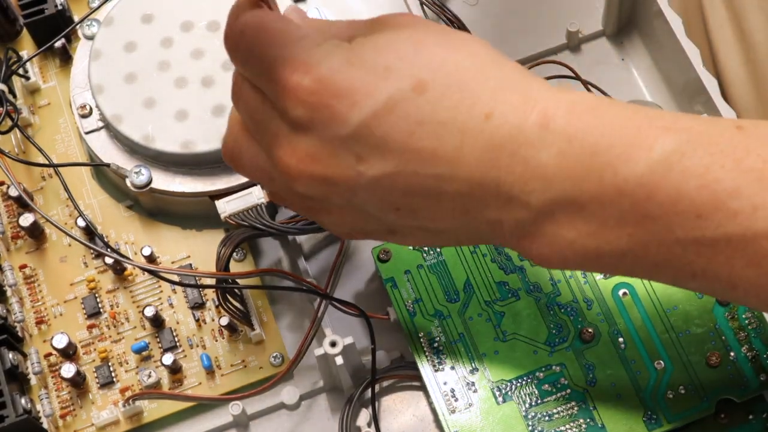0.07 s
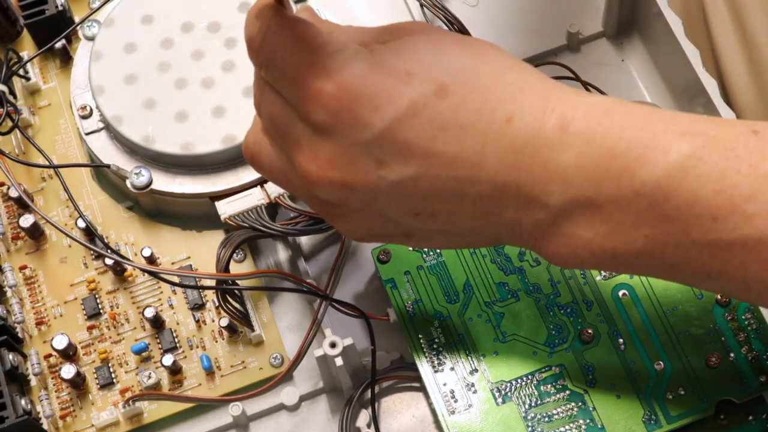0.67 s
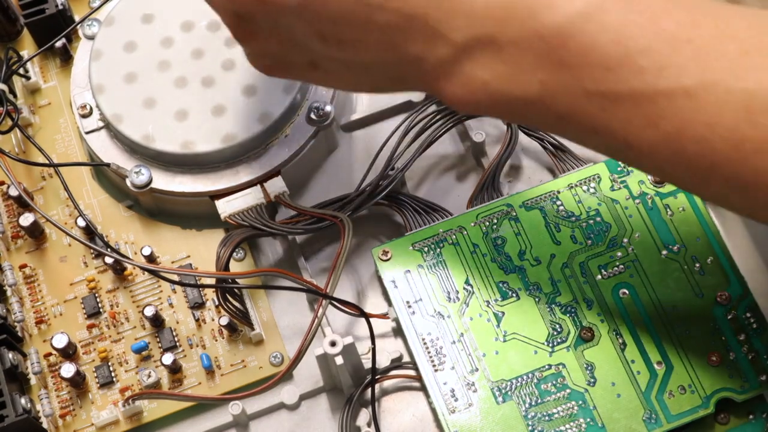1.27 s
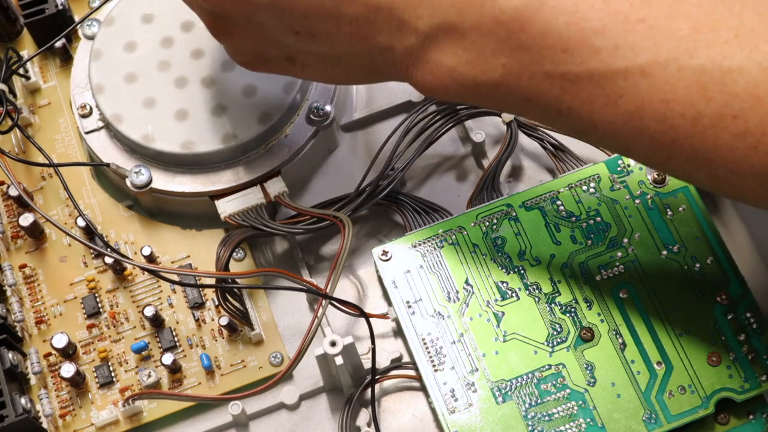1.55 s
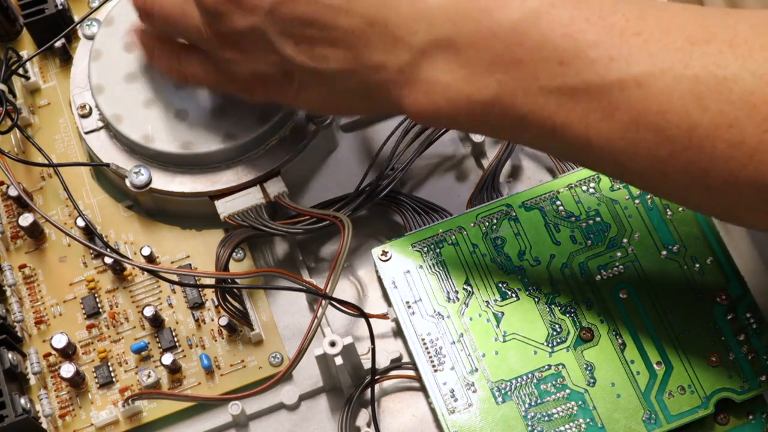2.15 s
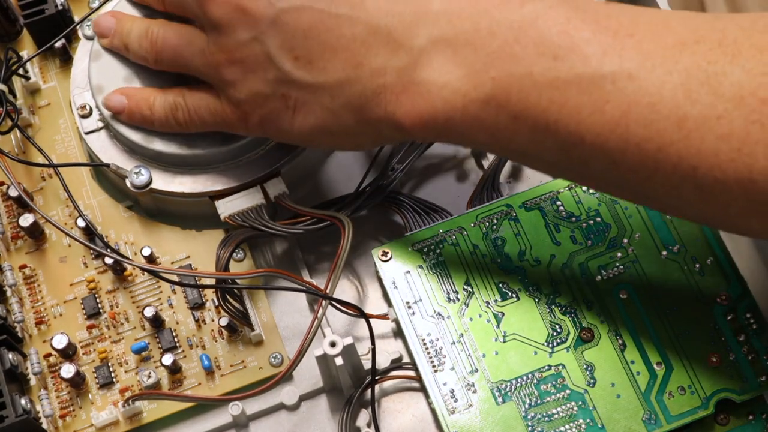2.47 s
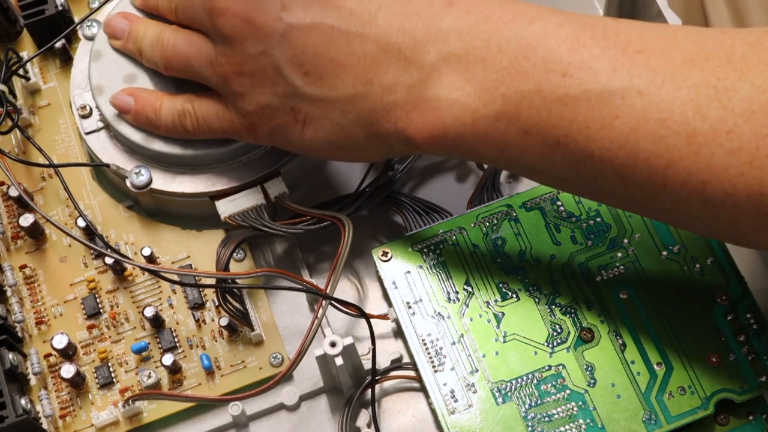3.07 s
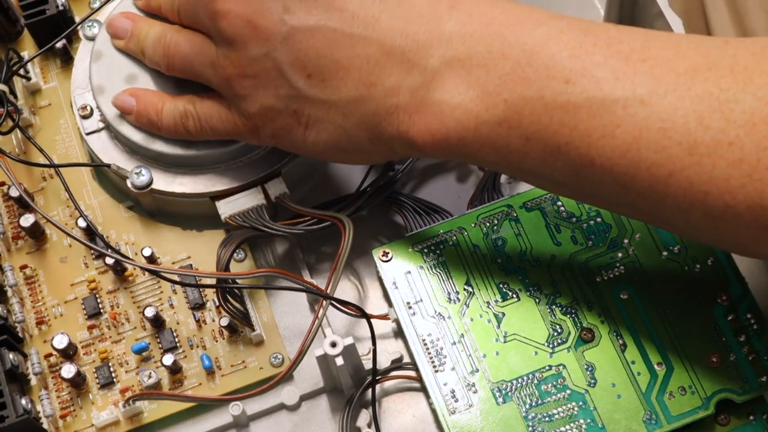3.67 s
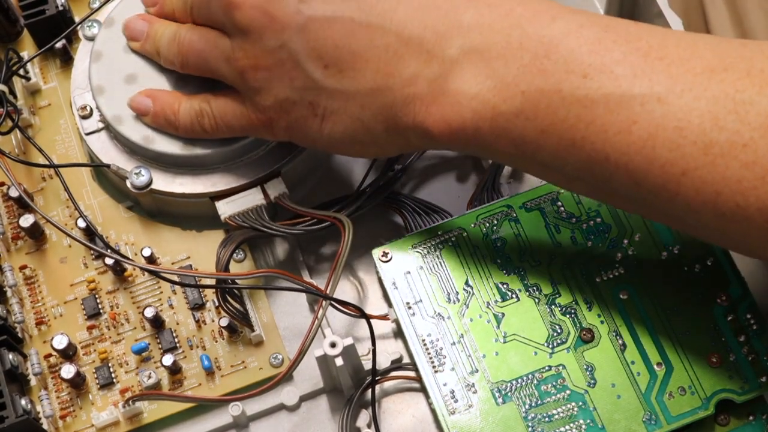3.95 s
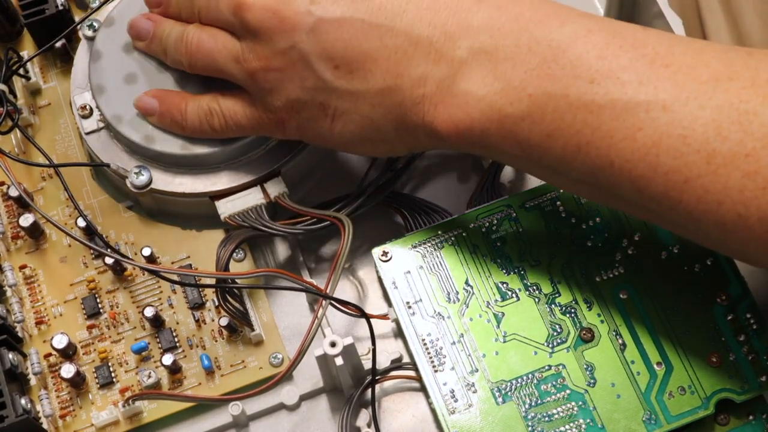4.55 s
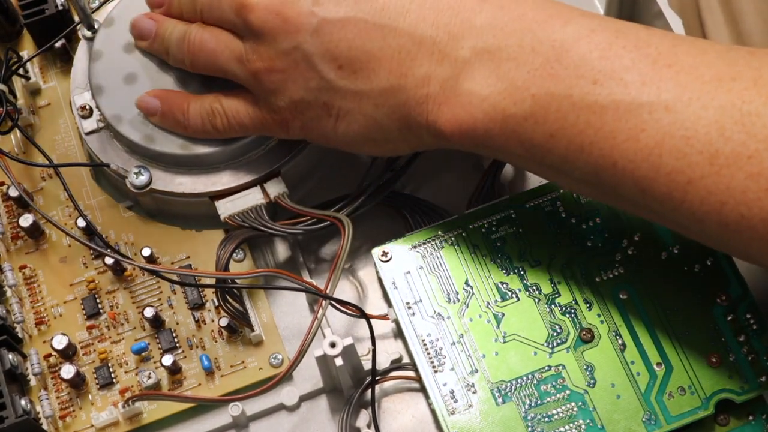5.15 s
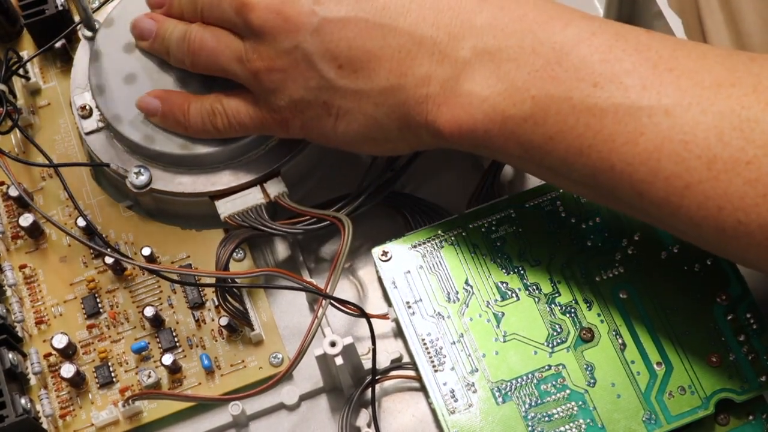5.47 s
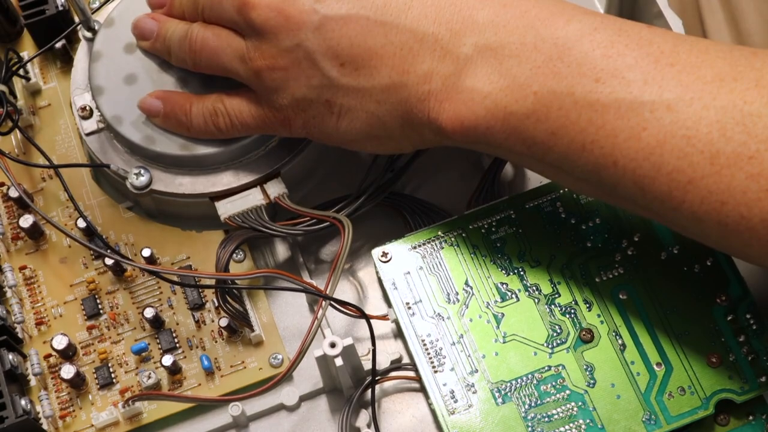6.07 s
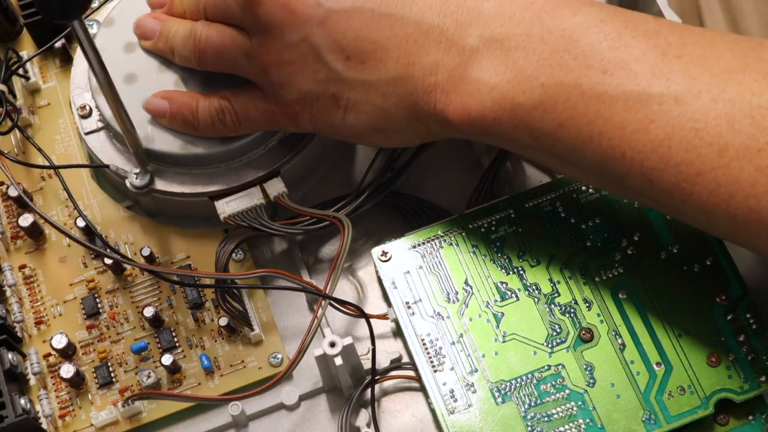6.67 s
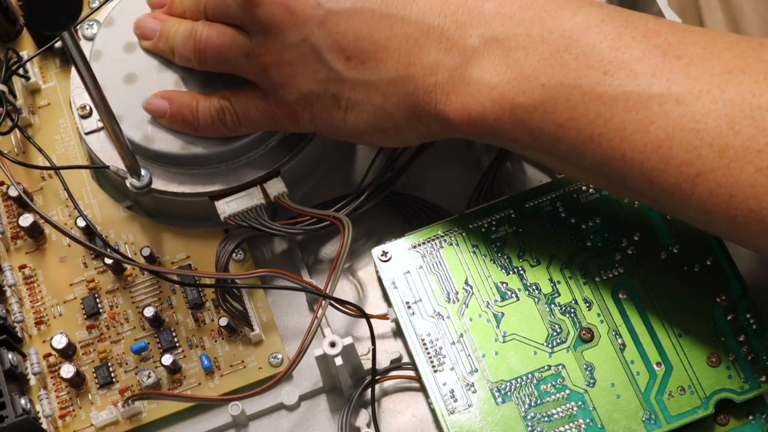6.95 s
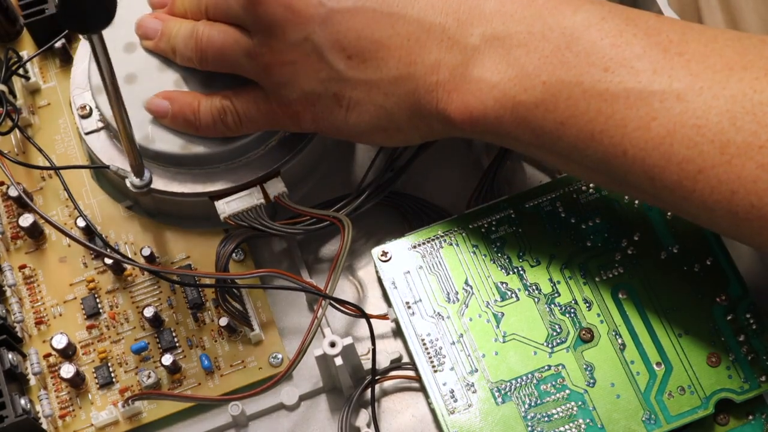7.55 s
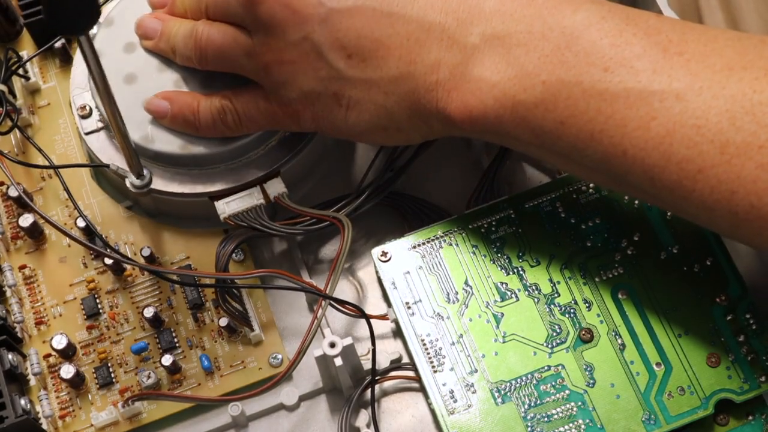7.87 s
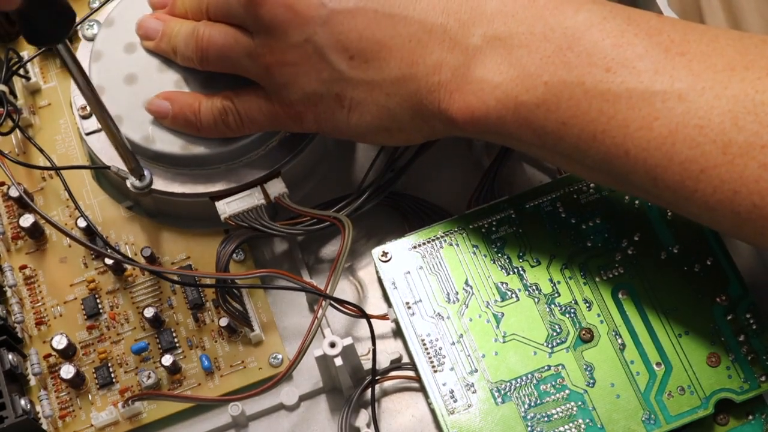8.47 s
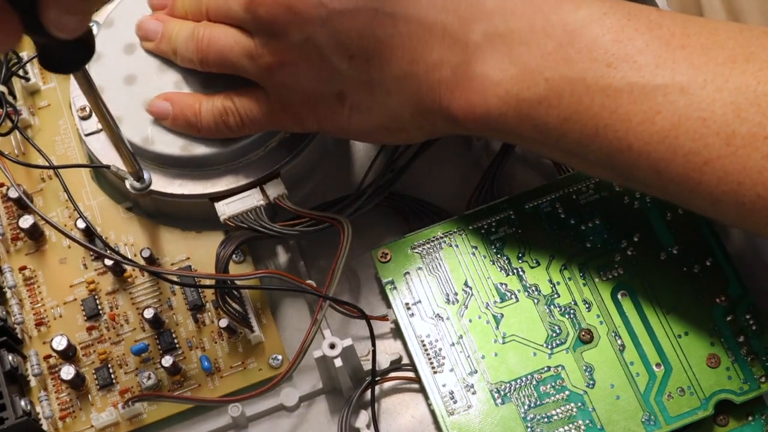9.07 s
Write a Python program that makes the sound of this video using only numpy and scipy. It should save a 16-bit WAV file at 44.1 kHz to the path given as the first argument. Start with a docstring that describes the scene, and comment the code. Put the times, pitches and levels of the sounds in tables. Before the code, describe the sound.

Close up in a small workshop with a faint steady hum, hands work a screwdriver in an appliance. Scattered metallic clicks and taps give way to a hand rubbing and bumping the sheet metal. Then comes a run of sharp clicks and snaps as the tip slips from a grinding screw, with one tiny squeak. After a last snap, the case knocks hollowly and dry rubbing dies away.

```python
"""Hands work a steel screwdriver inside an open appliance, close up in stereo, over a faint workshop hum.
First the tip clicks and scrapes on a metal cover and its screws, and pushes knock the sheet chassis.
Around 3 s a palm rubs and thumps the cover, and a loose circuit board taps its support.
From 4.8 s come hard clicks: a screw grinds, squeaks once, and the tip snaps out of its recess.
After a last snap at 7.7 s the hollow case thocks, burrs crackle and the rubbing dies away."""
import sys
import numpy as np
from scipy import signal
from scipy.fft import rfft, irfft
from scipy.io import wavfile
from scipy.ndimage import uniform_filter1d

SR = 44100
rng = np.random.default_rng(int(sys.argv[2]) if len(sys.argv) > 2 else 0)


def materialize(psi):
    """Save the field psi as 16-bit PCM at rate SR to the path in sys.argv[1].

    A 1-D psi becomes a single channel; in a 2-D psi each row is a channel.
    """
    bounded = np.clip(np.atleast_2d(psi).T, -1, 1)
    quanta = np.round(bounded * 32767).astype(np.int16)
    wavfile.write(sys.argv[1], SR, quanta)


N = 410217
T = np.arange(N) / SR
RING = SR // 2  # samples in one hit and its tail


# steel-on-steel hits: (time [s], strength [dB], brightness [dB/octave], part that rings)
CLICKS = [(0.1123, -11, 0.5, "rim"), (0.117, -22.5, -6, "rim"), (1.0143, -27.5, 0, "cover"),
          (1.033, -30, 8.5, "blade"), (1.078, -26, -6, "rim"), (1.103, -23, -1.5, "rim"),
          (1.162, -28.5, -1, "cover"), (1.7123, -25, 10, "rim"), (1.8689, -27.5, -2, "screw"),
          (1.9835, -10, 2.5, "screw"), (1.9898, -9.5, 3, "screw"), (2.42, -24, -2, "screw"),
          (2.851, -25, -0.5, "cover"), (3.099, -22.5, 0, "rim"), (3.166, -22.5, 6, "blade"),
          (3.243, -16, -0.5, "rim"), (3.33, -21, -0.5, "screw"), (3.485, -29, -1, "cover"),
          (3.5766, -30.5, -2, "cover"), (3.735, -28, -2, "screw"), (4.0304, -32, -3, "screw"),
          (4.2216, -27.5, 8, "rim"), (4.2326, -26, 0.5, "screw"), (4.808, -11.5, 1, "cover"),
          (4.8135, -10.5, 0.5, "cover"), (4.8597, -11.5, 6, "blade"), (4.8947, -17, 10, "cover"),
          (4.8983, -12, -1, "cover"), (4.945, -31.5, 14.5, "blade"), (5.146, -9.5, 2, "rim"),
          (5.158, -7, 1, "blade"), (5.41, -13, 4.5, "blade"), (5.42, -12.5, -0.5, "rim"),
          (5.555, -31.5, 0, "screw"), (5.658, -9, 1.5, "screw"), (5.6652, -11, -1.5, "cover"),
          (5.9769, -29, 0.5, "screw"), (6.036, -42, -3, "cover"), (6.2914, -37, -3, "screw"),
          (6.408, -23.5, 2.5, "rim"), (6.425, -33, 8, "blade"), (6.6773, -12.5, 0, "screw"),
          (6.6892, -14, -1, "screw"), (6.761, -18.5, 4, "cover"), (6.839, -22.5, 4, "blade"),
          (7.7356, -9.5, 4.5, "rim"), (7.9575, -18.5, 3, "rim"), (8.226, -27.5, 3, "blade"),
          (8.322, -30.5, -1, "cover"), (8.496, -30, 0.5, "cover")]
# modes of each steel part: (frequency [Hz], width [Hz], level [dB])
STEEL_MODES = {"screw": [(1208, 44, 4.5), (1486, 47, 15.5), (1630, 45, -2.5), (2667, 32, 1),
               (2833, 110, -5), (3770, 180, -4), (4830, 92, -23)], "cover": [(1546, 53, -8.5),
               (2005, 110, -8), (2630, 44, 0.5), (2793, 30, 5.5), (3130, 35, -1.5), (3680, 75, -7),
               (3860, 54, 6.5), (5230, 56, -14)], "rim": [(1270, 130, -7), (1460, 99, 7), (1610, 80, 5),
               (1980, 65, -1.5), (2180, 95, -4), (2900, 120, 0), (4650, 280, -4)],
               "blade": [(1560, 170, 10), (2540, 76, 7), (3760, 100, 8), (4560, 62, 6), (4830, 97, 0),
               (5400, 76, -22), (5740, 120, 2), (6620, 110, 1), (7260, 160, -15)]}
# EQ of the steel contact: (frequency [Hz], gain [dB])
CONTACT_EQ = [(300, 29), (1000, 28.5), (1600, 24), (2700, 21.5), (4300, 19.5), (7000, 12), (11500, 6),
              (13500, -7), (15500, -35)]
# clank, tick, snap and edge: (low [Hz], high [Hz], offset [dB], growth with force [dB/dB])
CLICK_BANDS = [(1160, 2480, -7.5, -0.2652), (2970, 5750, -13.5, 0.0444), (4940, 7500, -21, 0.09),
               (8400, 17300, -27.5, 0.41)]

def clicks(settle_db=-24, ring_db=-3):
    """The tip cracks down, rings one steel part and grates as it settles; its angle sets the brightness."""
    out = np.zeros(N)
    for s, db, brightness, part in CLICKS:
        contact = fade(t60=0.024) * rise(0.0017) + undb(settle_db) * fade(t60=0.15)
        crack = colour(grit(RING, spread_db=1.0) * contact, CONTACT_EQ)
        hit = unit_energy(crack)
        add(hit, 0, undb(ring_db) * ringing(STEEL_MODES[part], scatter_db=5, detune=0.015))
        add(out, s, blow(hit, CLICK_BANDS, db, brightness, pivot_hz=4340, window=300))
    return out


# the tip jumping out: (time [s], level [dB])
SNAPS = [(5.161, -20), (5.419, -19), (5.662, -28), (7.74, -15)]
# EQ of its crack: (frequency [Hz], gain [dB])
SNAP_EQ = [(600, -7), (1400, -16), (2700, 0), (5800, 1.5), (8000, -6), (11500, -6.5), (13000, -18),
           (15500, -35)]

def snaps(crack_t60=0.023, wash_db=-21, wash_t60=0.19):
    """The tip jumps out of the screw's recess: a sharp crack, then the sheet shimmers without a pitch."""
    out = np.zeros(N)
    for s, db in SNAPS:
        crack = grit(RING, spread_db=-3) * fade(crack_t60) * rise(0.00039)
        wash = undb(wash_db) * rng.standard_normal(RING) * fade(wash_t60) * rise(0.0013)
        add(out, s, peak(colour(crack + wash, SNAP_EQ), db, window=300))
    return out


# chassis hits: (time [s], strength [dB], hardness [dB/octave])
KNOCKS = [(0.113, -23, 4), (0.189, -30.5, -1.5), (0.274, -31.5, 2.5), (0.65, -36, 1), (1.014, -36, -4),
          (1.078, -29.5, 2.5), (1.103, -31.5, 1), (1.722, -40, 10), (1.996, -23.5, 4), (2.199, -36.5, 0.5),
          (2.364, -34, 1), (2.423, -34.5, 6.5), (2.962, -30, 3), (3.247, -25, -3), (3.326, -27, -4),
          (3.487, -31, -2), (3.535, -34, 0), (3.571, -24, 0.5), (3.677, -29.5, 4.5), (3.736, -25, -1),
          (3.886, -32, 5), (3.966, -40, 0.5), (4.012, -31, 7.5), (4.03, -26.5, 3.5), (4.233, -41, 4),
          (4.859, -28.5, 6), (4.901, -18.5, 2), (4.912, -37, 2), (5.153, -21.5, 2.5), (5.423, -21.5, 5.5),
          (5.639, -32.5, 6), (5.661, -22, 7), (5.795, -23.5, -0.5), (5.979, -27, -1), (6.001, -28.5, 0),
          (6.113, -36.5, 2), (6.249, -31, 5.5), (6.291, -37, -2.5), (6.412, -31.5, 2), (6.486, -38.5, 1),
          (6.68, -25.5, 0), (6.708, -38, 12), (7.733, -28, 3.5), (8.002, -35, 8.5), (8.257, -46, -5),
          (8.393, -30.5, -1.5), (8.497, -28.5, -0.5), (8.586, -30.5, 1), (8.858, -37, 0.5),
          (9.26, -41, 0.5)]
# sheet-metal modes: (frequency [Hz], width [Hz], level [dB])
CHASSIS_MODES = [(167, 20, -6), (227.1, 8.5, 3.5), (247.7, 14, -7), (285.7, 21, -0.5), (337, 95, -1),
                 (416.8, 7.3, -1.5), (458.4, 6.1, 5.5), (505.7, 25, -4.5), (549.6, 6.8, 3), (604, 2.7, 0.5),
                 (663, 7.8, -3), (750, 18.5, -1), (829, 8.1, -0.5), (828, 190, -8), (1018, 120, -10.5),
                 (1272, 19, -13), (1626, 65, -15.5), (2067, 82, -23)]
# boom, ring and clank: (low [Hz], high [Hz], offset [dB], growth with force [dB/dB])
KNOCK_BANDS = [(166, 296, -4, -0.61), (397, 766, -3, 0.34), (1130, 2560, -10.5, 0)]

def knocks(rattle_db=-7):
    """A blow rings the chassis, and the boards and wires on it rattle briefly."""
    out = np.zeros(N)
    for s, db, hardness in KNOCKS:
        rattle = rng.standard_normal(RING) * fade(t60=0.11) * rise(0.00094)
        hit = undb(rattle_db) * unit_energy(rattle)
        add(hit, 0, ringing(CHASSIS_MODES, scatter_db=0.5, damped_hz=2.3, detune=0.0284))
        add(out, s, blow(hit, KNOCK_BANDS, db, hardness, pivot_hz=567, window=600))
    return out


# firm pushes: (time [s], level [dB])
THOCKS = [(3.054, -24.5), (4.811, -19.5), (5.667, -18.5), (7.805, -18.5), (7.957, -17.5)]
# hollow-case modes: (frequency [Hz], width [Hz], level [dB])
CASE_MODES = [(207, 14, 1), (279, 22, -1), (361, 62, 2.5), (460, 16.5, 10), (655, 47, -0.5), (715, 70, 0.5),
              (787, 34, 1)]

def thocks():
    """A firm push shifts the case, which answers with a hollow thock."""
    return strikes(THOCKS, CASE_MODES, rebound_s=0.019, rebound_db=-9,
                   rattle_db=-4, rattle_t60=0.089, lo_hz=277, hi_hz=770)


# board hits: (time [s], level [dB])
TAPS = [(0.189, -24.5), (3.3965, -24), (3.418, -43), (3.571, -28), (4.8995, -17.5), (5.325, -31)]
# circuit-board modes: (frequency [Hz], width [Hz], level [dB])
BOARD_MODES = [(540, 65, -7), (767, 87, 6), (984, 120, 5), (1300, 97, -11)]

def taps():
    """A loose circuit board taps its support."""
    return strikes(TAPS, BOARD_MODES, rebound_s=0.011, rebound_db=-10,
                   rattle_db=-8.5, rattle_t60=0.039, lo_hz=594, hi_hz=1430)


# blade or fingernail slides: (peak time [s], half length [s], level [dB])
SCRAPES = [(0.044, 0.015, -39.5), (0.147, 0.031, -38), (1.085, 0.0055, -36.5), (1.106, 0.0081, -29),
           (1.714, 0.0068, -36.5), (2.143, 0.038, -43.5), (2.776, 0.025, -32), (3.021, 0.017, -30.5),
           (3.239, 0.017, -29.5), (3.188, 0.0089, -39), (3.748, 0.0084, -29.5), (4.818, 0.005, -26),
           (4.888, 0.014, -30), (5.127, 0.0093, -33.5), (5.153, 0.0062, -24.5), (5.204, 0.042, -40),
           (5.418, 0.011, -24.5), (5.664, 0.012, -24.5), (5.77, 0.035, -44), (6.424, 0.0063, -37),
           (6.713, 0.02, -30.5), (8.261, 0.019, -32), (8.315, 0.0045, -48), (8.495, 0.0063, -33)]

def scrapes(ring_db=4):
    """Short gritty slides ring the screw and the cover under it."""
    force = grit(N, spread_db=5) * undb(3 * walk(190))
    ring = excite(force, ringing(STEEL_MODES["screw"] + STEEL_MODES["cover"], scatter_db=-5.5))
    return swells(SCRAPES) * unit(colour(force, CONTACT_EQ) + undb(ring_db) * ring)


# turns of the screw: (peak time [s], half length [s], level [dB])
GRINDS = [(4.922, 0.012, -24), (5.133, 0.012, -31), (5.167, 0.019, -25), (5.365, 0.028, -33.5),
          (5.437, 0.017, -27), (5.68, 0.032, -27), (7.817, 0.016, -47), (7.96, 0.018, -33.5),
          (8.028, 0.015, -41), (8.254, 0.028, -34), (8.34, 0.021, -38), (8.397, 0.012, -44),
          (8.495, 0.014, -35.5), (8.647, 0.014, -36)]
# modes of the plate round it: (frequency [Hz], width [Hz], level [dB])
PLATE_MODES = [(410, 55, 3.5), (512, 28, 4.5), (667, 40, 1), (775, 28, 6.5), (826, 34, 1), (990, 170, -14)]

def grinds(rough_db=0.5):
    """The thread catches and slips in quick uneven steps that ring the plate."""
    force = grit(N, spread_db=6) * undb(rough_db * walk(120))
    return swells(GRINDS) * unit(excite(force, ringing(PLATE_MODES, scatter_db=0.0)))


# the thread binding: (peak time [s], half length [s], pitch [Hz], level [dB])
SQUEAKS = [(5.134, 0.014, 828, -26)]

def squeaks(waver=0.157, rough_db=10.5):
    """Stick-slip in the thread settles briefly on a rough, unsteady pitch."""
    phase = 2 * np.pi * np.cumsum(1 + waver * walk(420)) / SR
    tone = sum(swell(s, half, db) * np.sin(hz * phase) for s, half, hz, db in SQUEAKS)
    return undb(rough_db * walk(190)) * tone


# palm bumps: (time [s], level [dB])
BUMPS = [(0.114, -32), (1.083, -40), (1.995, -28), (2.811, -31.5), (3.047, -25.5), (3.246, -23),
         (3.325, -30), (3.421, -35), (3.754, -30.5), (4.23, -37.5), (4.899, -31), (5.18, -36),
         (5.667, -29.5), (8.363, -27.5), (8.51, -27), (8.577, -31)]
# EQ of the low thump: (frequency [Hz], gain [dB])
THUMP_EQ = [(15, -10), (35, -28), (58, 18.5), (80, 4), (130, 4), (220, -3.5), (500, -75)]

def bumps():
    """The soft palm moves the whole case without ringing the steel."""
    out = np.zeros(N)
    for s, db in BUMPS:
        thump = colour(rng.standard_normal(RING), THUMP_EQ) * fade(t60=0.27) * rise(0.0091)
        add(out, s, peak(thump, db, window=700))
    return out


# fader moves for three spells of handling: (time [s], sliding [dB], rocking [dB])
HAND_SPELLS = [
    [(1.9, -41.5, -45), (2.05, -45, -65), (2.66, -45.5, -52), (2.8, -38.5, -37), (2.93, -39, -36),
     (3.27, -33, -35), (3.48, -38, -33), (3.79, -54, -43), (4.2, -59, -44)],
    [(5.15, -45, -58), (5.22, -36, -44), (5.33, -47, -43), (5.57, -36, -40), (5.86, -43, -44),
     (6.03, -38, -34), (6.2, -60, -47), (6.34, -37, -35), (6.65, -58, -60)],
    [(7.88, -43, -47), (7.99, -30.5, -58), (8.13, -55, -51), (8.27, -38, -33), (8.38, -39.5, -40),
     (8.44, -48, -33), (8.56, -52, -37), (8.76, -41, -43), (9.3, -48, -44)],
]
# EQ of dry rubbing: (frequency [Hz], gain [dB])
FRICTION_EQ = [(300, -14), (800, 8.5), (1700, 2), (3500, 0.5), (7000, -25), (13000, -20), (15500, -52)]

def hand(thump_db=-1, creak_db=3.5, friction_db=-12):
    """The hand shifts in small slips: sliding makes the sheet creak and rub, rocking thumps the case."""
    def fader(column):
        return sum(undb(np.interp(T, spell[:, 0], spell[:, column], left=-120, right=-120))
                   for spell in map(np.array, HAND_SPELLS))
    sliding, rocking = fader(1), fader(2)
    thump = unit(colour(rng.standard_normal(N) * undb(walk(35)), THUMP_EQ))
    slips = grit(N, spread_db=5.5) * undb(6.35 * walk(45))
    creak = sheet_creak(slips)
    friction = unit(colour(unit(slips) + unit(ticks(per_s=110, spread_db=3)), FRICTION_EQ))
    rub = undb(creak_db) * creak + undb(friction_db) * friction
    return rocking * undb(thump_db) * thump + sliding * rub


def sheet_creak(slips, spots=4, roam_db=6):
    """The palm damps the sheet and roams over spots with slightly different resonances."""
    creak = np.zeros(N)
    for _ in range(spots):
        force = slips * undb(roam_db * walk(9))
        creak += excite(force, ringing(CHASSIS_MODES, scatter_db=2.5, damped_hz=7.9, detune=0.056))
    return unit(colour(creak, [(150, 14.5), (300, 7), (500, -1.0), (1000, -0.5), (2000, -2)]))


# crackle bursts: (peak time [s], half length [s], level [dB])
CRACKLES = [(3.27, 0.024, -42), (3.403, 0.016, -31), (5.865, 0.015, -41), (6.035, 0.017, -54),
            (6.27, 0.022, -44.5), (8.005, 0.012, -41), (8.262, 0.01, -38), (8.364, 0.055, -44.5),
            (8.518, 0.028, -41), (8.603, 0.025, -46.5)]
# their EQ: (frequency [Hz], gain [dB])
CRACKLE_EQ = [(250, -27), (600, 9.5), (1100, 10.5), (2200, -9), (3200, -9), (6000, -25), (15000, -43)]

def crackles(patchy_db=2):
    """Burrs under the screw head and the cover's edge break loose as a fine, dry crackle."""
    force = ticks(per_s=500, spread_db=2.5) * undb(patchy_db * walk(150))
    return swells(CRACKLES) * unit(colour(force, CRACKLE_EQ))


# skin swishes: (peak time [s], half length [s], level [dB])
SWISHES = [(1.421, 0.018, -45.5), (2.324, 0.032, -49), (2.555, 0.054, -48.5), (3.01, 0.11, -53),
           (3.33, 0.024, -50), (3.5, 0.024, -41), (3.6, 0.022, -45.5), (3.762, 0.026, -41),
           (3.925, 0.014, -43.5), (4.003, 0.033, -50.5), (5.913, 0.021, -47), (6.013, 0.0068, -49),
           (8.403, 0.024, -51), (8.559, 0.029, -47.5), (8.642, 0.019, -48.5)]
# their EQ: (frequency [Hz], gain [dB])
SKIN_EQ = [(500, -7), (1500, 6.5), (3500, 3), (7000, -2), (11500, -2.5), (15500, -20)]

def swishes():
    """Skin hisses softly as it slides over the cover."""
    force = grit(N, spread_db=4.5) * undb(3 * walk(160))
    return swells(SWISHES) * unit(colour(force, SKIN_EQ))


def wall(x, delay_s=.02, echo_db=-9):
    """One dull, slightly smeared reflection from a nearby wall."""
    smear = rng.standard_normal(RING) * fade(t60=0.045)
    echo = np.zeros(N)
    add(echo, delay_s, excite(x, unit_energy(smear)))
    return undb(echo_db) * band(echo, 170, 820)


def room(x, t60=0.34, wet_db=-6, build_s=0.0038):
    """Diffuse tail of a small workshop."""
    tail = rng.standard_normal(RING) * fade(t60) * rise(build_s)
    wet = excite(x, unit_energy(tail))
    return undb(wet_db) * colour(wet, [(100, -11), (500, -2), (2000, 1), (6000, -5), (13000, -12)])


# EQ of the room tone: (frequency [Hz], gain [dB])
AIR_EQ = [(12, -45), (20, 1), (122, 3), (161, -6), (342, -7.5), (372, -3), (427, -8.5), (565, -5),
          (767, -5.5), (834, -7.5), (1500, -12.5), (1980, -13.5), (2270, -15.5), (10800, -40), (15500, -63)]
# hum partials: (frequency [Hz], level [dB])
HUM_PARTIALS = [(120, -55.5), (580, -53.5), (820, -61.5), (2010, -62)]

def workshop(air_db=-40.5):
    """A bed of steady air noise and slightly wavering machine hum."""
    air = unit(colour(rng.standard_normal(N), AIR_EQ)) * undb(air_db + 0.1 * walk(4.6))
    hum = sum(undb(db + walk(2.17)) * np.sqrt(2) * np.sin(2 * np.pi * hz * T + 1.85 * walk(4))
              for hz, db in HUM_PARTIALS)
    return air + hum


def blow(x, bands, db, tilt, pivot_hz, window, usual_db=-23.5):
    """Voice one impact: hard contact favours the high bands, and force wakes some more than others."""
    out = 0
    for k, (lo, hi, offset, growth) in enumerate(bands):
        octaves = np.log2(np.sqrt(lo * hi) / pivot_hz)
        level = db + offset + growth * (db - usual_db) + tilt * octaves
        out += (-1) ** k * peak(band(x, lo, hi), level, window)  # alternate signs avoid notches
    return out


def strikes(rows, modes, rebound_s, rebound_db, rattle_db, rattle_t60, lo_hz, hi_hz):
    """Blunt blows ring one body and make its loose joints chatter; it rebounds once, more softly."""
    out = np.zeros(N)
    for s, db in rows:
        for lag, loss in ((0, 0), (rebound_s, rebound_db)):
            chatter = grit(RING, spread_db=4.5) * fade(rattle_t60) * rise(.002)
            rattle = band(band(chatter, lo_hz, hi_hz), lo_hz, hi_hz)
            hit = undb(rattle_db) * unit_energy(rattle)
            add(hit, 0, ringing(modes, scatter_db=0.5, detune=0.0077))
            hit = band(hit, lo_hz / 2, hi_hz)  # the blunt contact softens the attack
            add(out, s + lag, peak(hit, db + loss, window=600))
    return out


def ringing(modes, scatter_db, damped_hz=0, detune=0):
    """A struck body: the spot sets each mode's level and phase, a touch damps it, pressure detunes it."""
    t = np.arange(RING // 2) / SR
    hz, width, db = np.transpose(modes)[:, :, None]
    hz = hz * (1 + detune * rng.standard_normal(hz.shape))
    size = undb(db + scatter_db * rng.standard_normal(db.shape)) * width
    build = 1 - np.exp(-2 * hz * t)  # slow bending waves: the low modes arrive last
    decay = np.exp(-np.pi * (width + damped_hz) * t)
    tones = np.sin(2 * np.pi * (hz * t + rng.random(hz.shape)))
    return unit_energy(np.sum(size * build * decay * tones, axis=0))


def grit(count, spread_db):
    """Dense micro-impacts of unequal size."""
    size = np.minimum(rng.standard_normal(count), 3)
    return unit(rng.standard_normal(count) * undb(spread_db * size))


def ticks(per_s, spread_db):
    """Separate tiny ticks at random moments."""
    return (rng.random(N) < per_s / SR) * grit(N, spread_db)


def walk(rate_hz):
    """Smooth random wander with spread near 1."""
    knots = rng.standard_normal(5000)
    return np.interp(T * rate_hz, np.arange(len(knots)), knots)


def swell(s, half, db):
    """Pressure of one slide, rising and dying away."""
    return undb(db) * np.exp(-.5 * np.minimum(((T - s) / half) ** 2, 100))


def swells(rows):
    """Envelope of a series of slides."""
    return sum(swell(*row) for row in rows)


def rise(seconds):
    """Attack envelope."""
    return 1 - np.exp(-np.arange(RING) / SR / seconds)


def fade(t60):
    """Decay envelope, 60 dB down after t60 seconds."""
    return np.exp(-np.log(1000) * np.arange(RING) / SR / t60)


def excite(x, response):
    """Play x through an impulse response."""
    return signal.fftconvolve(x, response)[:N]


def colour(x, points):
    """EQ through (frequency [Hz], gain [dB]) points."""
    hz, db = np.transpose(points)
    f = np.maximum(np.fft.rfftfreq(len(x), 1 / SR), 1)
    return irfft(rfft(x) * undb(np.interp(np.log(f), np.log(hz), db)), len(x))


def band(x, lo_hz, hi_hz):
    """Band-pass with gentle skirts."""
    return signal.sosfilt(signal.butter(2, [lo_hz, hi_hz], "band", fs=SR, output="sos"), x)


def peak(x, db, window):
    """Set the rms level of the loudest stretch of window samples."""
    return x * undb(db) / np.sqrt(uniform_filter1d(x ** 2, window).max())


def undb(db):
    """Decibels to gain."""
    return 10 ** (np.asarray(db) / 20)


def unit(x):
    """Scale to rms 1."""
    return x / np.sqrt(np.mean(x ** 2))


def unit_energy(x):
    """Scale to energy 1."""
    return x / np.linalg.norm(x)


def add(track, s, x):
    """Mix x into the track at time s."""
    i = max(int(s * SR), 0)
    track[i:i + len(x)] += x[:N - i]


# stereo width, opening toward the treble: (frequency [Hz], side gain [dB])
SIDE_EQ = [(60, -44), (125, -25), (250, -11), (500, -11.5), (1000, -6.5), (2200, -2.5), (4400, 1),
           (8000, 1.5), (13000, 7)]

def scene(side_phase_rad=1.38, air_side_db=6.0):
    """The work sits a little to the left; room and air come from all round."""
    work = thocks() + taps() + clicks() + snaps() + knocks()
    work = work + scrapes() + crackles() + grinds() + squeaks() + bumps() + hand() + swishes()
    work = work + wall(work)
    mid = work + room(work) + workshop()
    roam = .3 * walk(15)  # the side signal turns in phase as the contact point moves
    direct = np.real(signal.hilbert(work) * np.exp(1j * (side_phase_rad + roam)))
    side = colour(direct + room(work, wet_db=-1.0) + undb(air_side_db) * workshop(), SIDE_EQ)
    return np.array([mid + side, mid - side])


def record(dry):
    """Clip at full scale and cut the treble above 15.6 kHz."""
    return signal.sosfilt(signal.ellip(12, .2, 90, 15600, fs=SR, output="sos"), np.clip(dry, -1, 1))


dry = scene()
out = record(dry)
materialize(out)
```